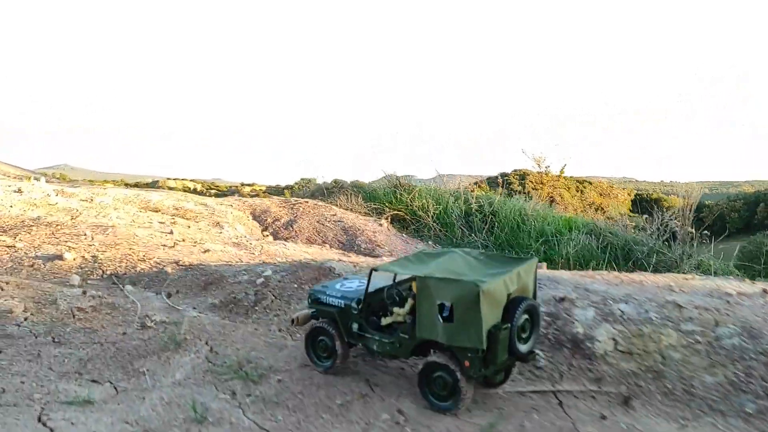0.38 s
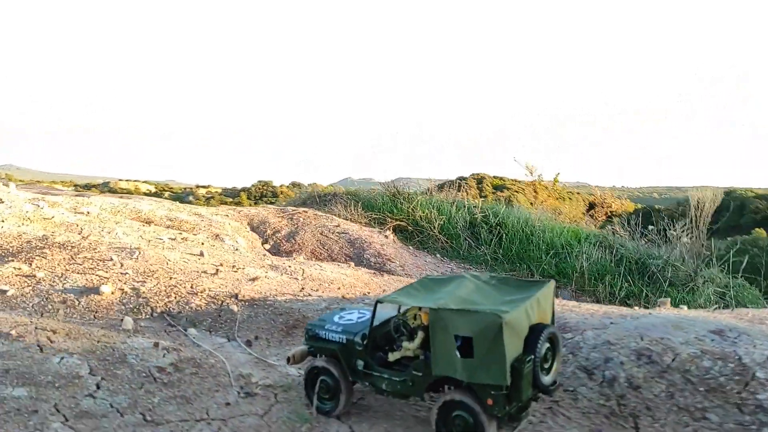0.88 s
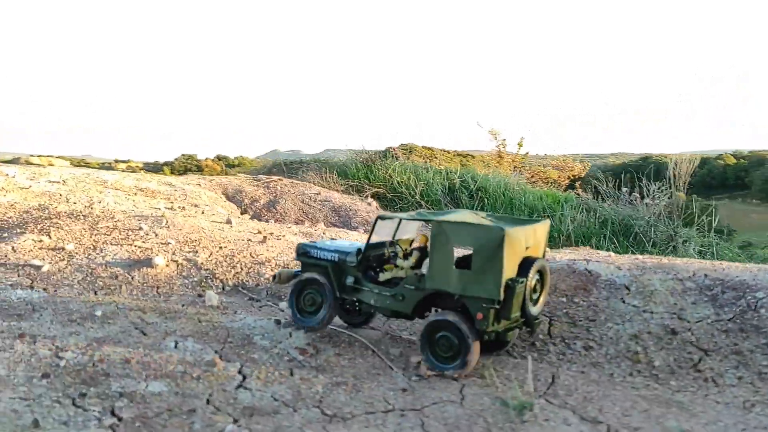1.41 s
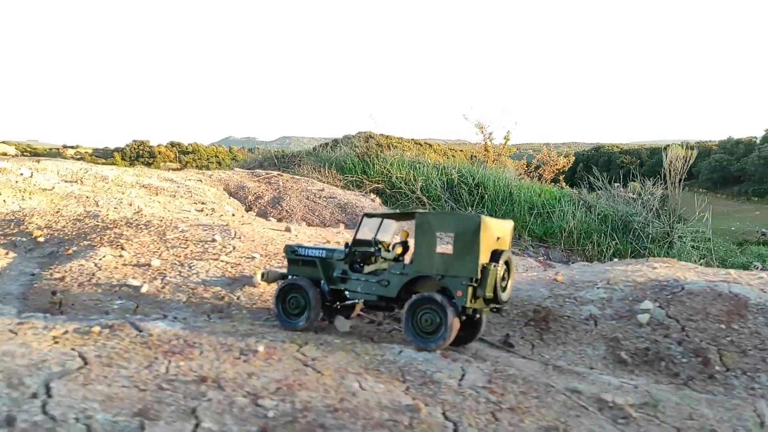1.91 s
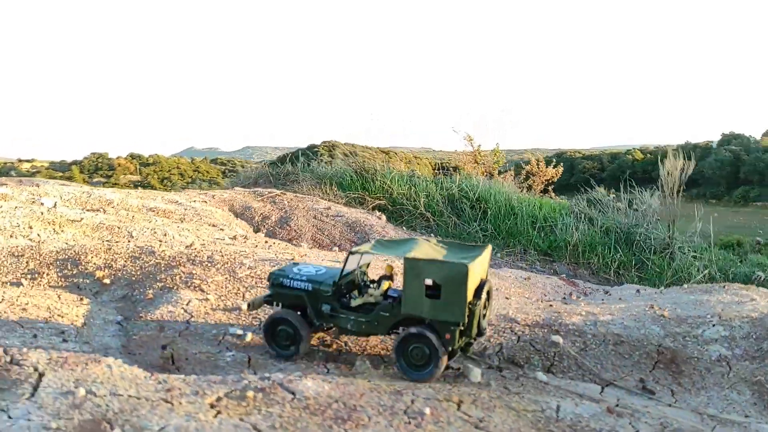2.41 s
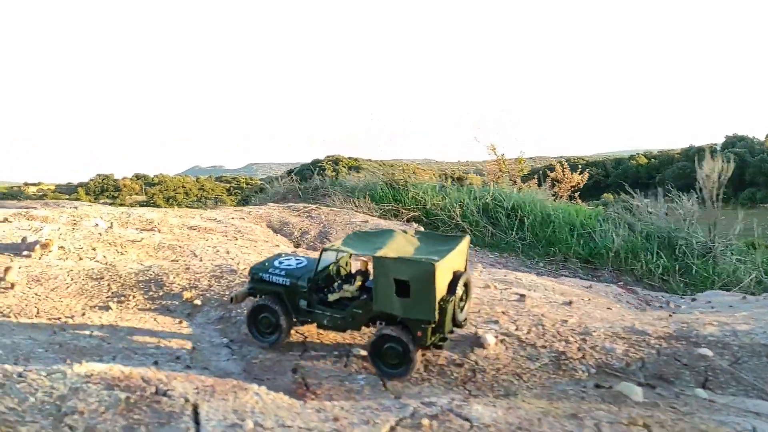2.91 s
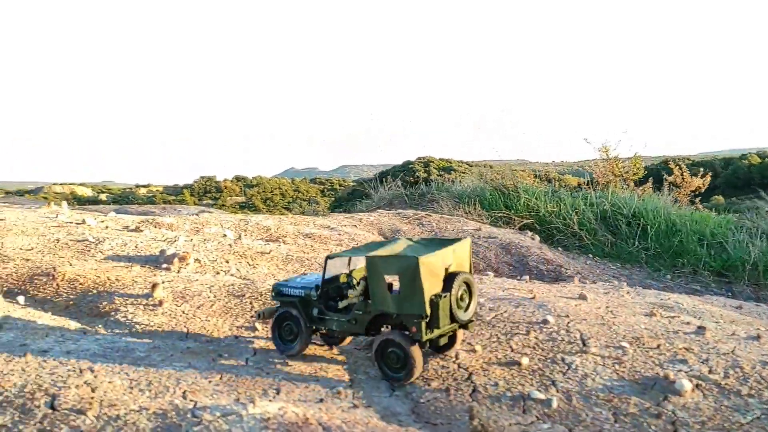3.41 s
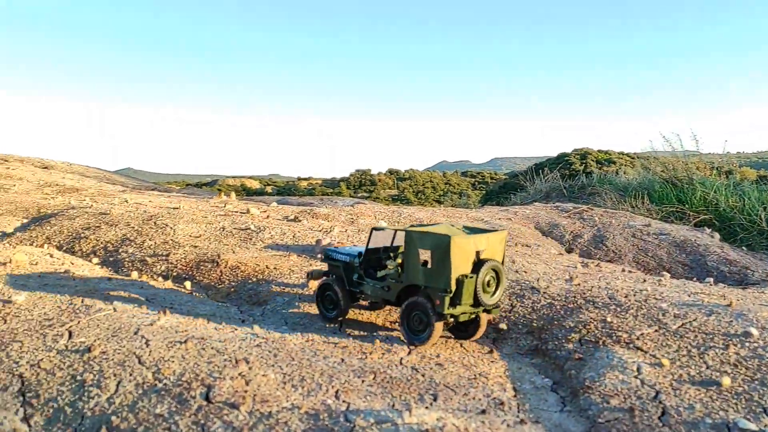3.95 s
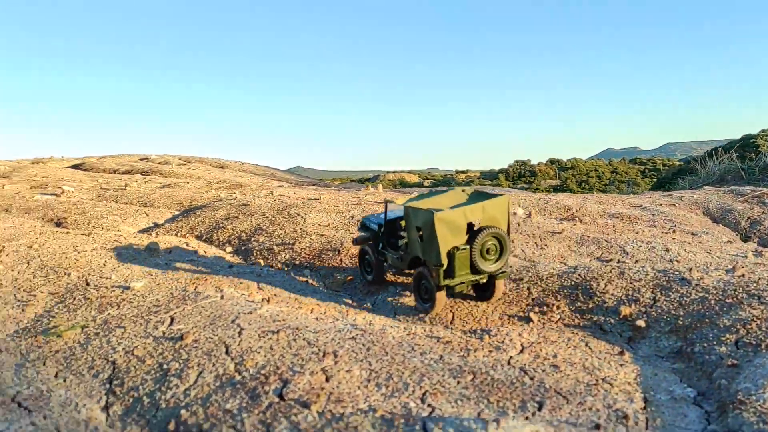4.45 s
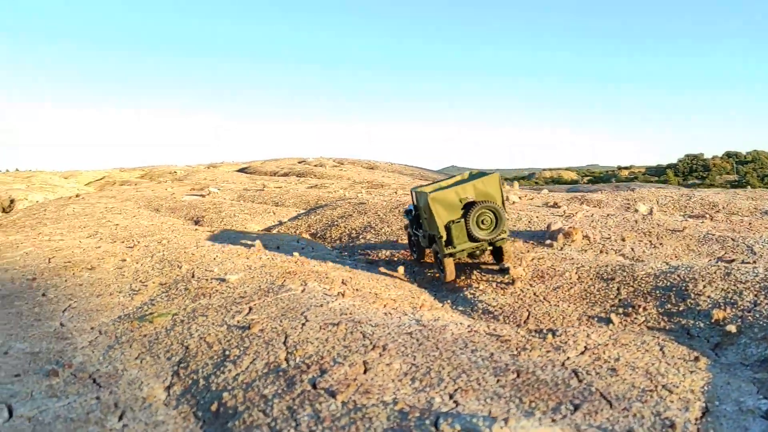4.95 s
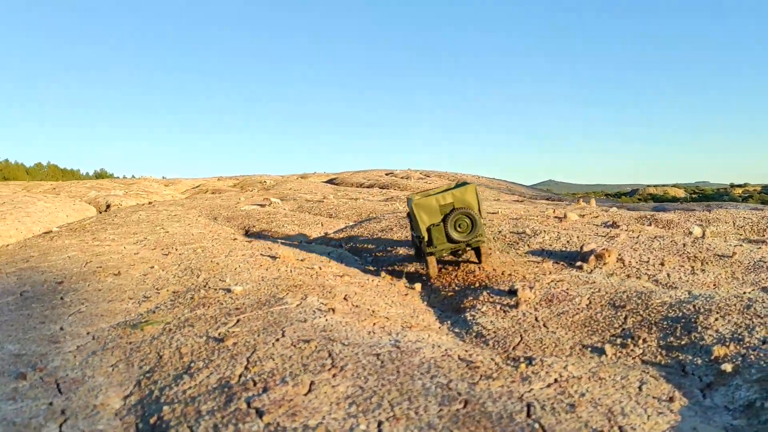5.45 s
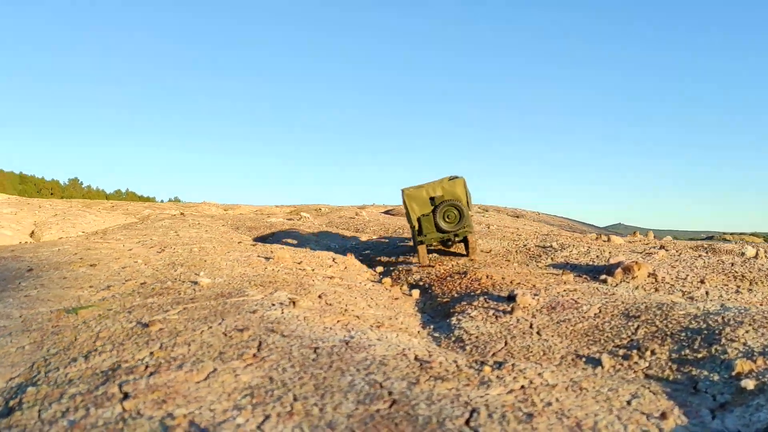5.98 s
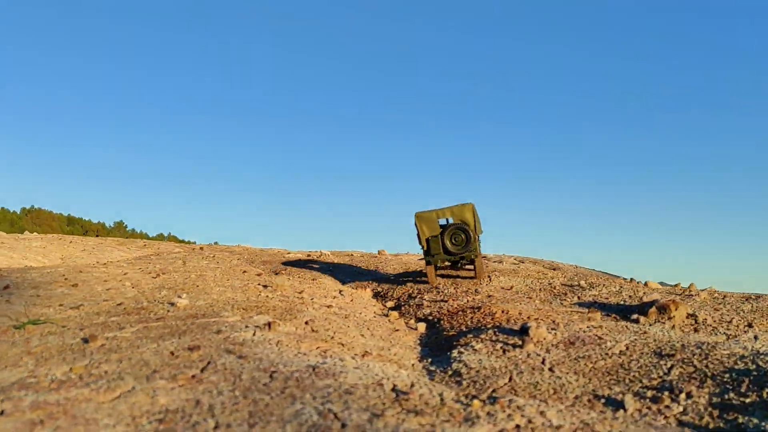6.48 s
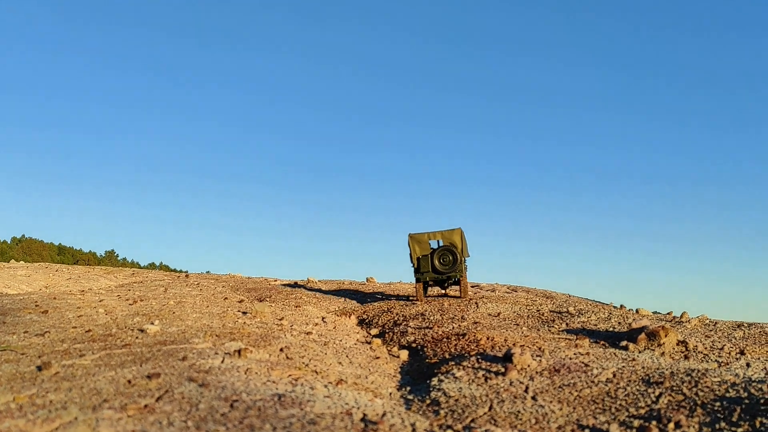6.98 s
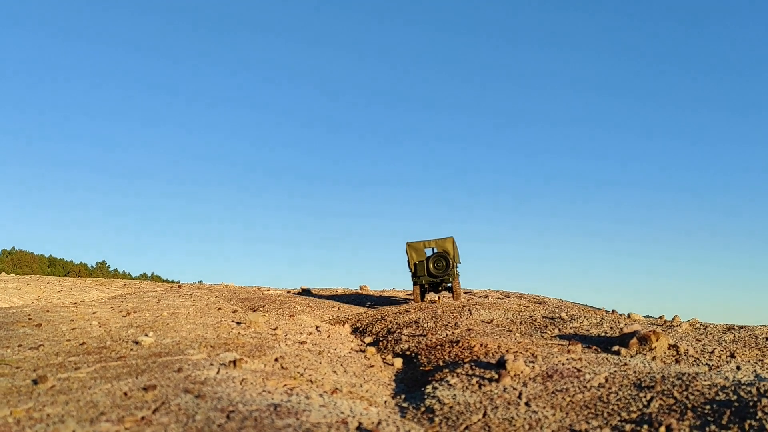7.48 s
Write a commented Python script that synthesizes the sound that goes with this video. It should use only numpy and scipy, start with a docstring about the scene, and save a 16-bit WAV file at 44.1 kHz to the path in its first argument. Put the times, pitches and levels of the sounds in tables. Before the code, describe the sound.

Outdoors on hard, dry dirt, a small electric toy car crawls past close by with a bright, throbbing gear hiss, grainy rasp and thin buzzing motor whir. Pebbles snap sharply under its tyres in the first three seconds and the plastic chassis knocks. It then turns and drives away uphill, the hiss fading and the motor slowing to a lower whir. Light wind thumps separately on the two microphones of a phone.

```python
"""Dry, stony dirt outdoors: a small electric toy car crawls past side-on, then turns and drives away
from a phone with two microphone ports. Gears and crushed grit are throbbing filtered noise; the motor is
beating noise through shell resonances, with tones at multiples of the shaft speed. Pebbles snap and the
chassis knocks in short bursts of noise; a light wind thumps on each port by itself, as low noise."""
import sys
import numpy as np
from scipy import signal
from scipy.fft import rfft, irfft
from scipy.io import wavfile
from scipy.ndimage import uniform_filter1d, map_coordinates

SR = 44100
rng = np.random.default_rng(int(sys.argv[2]) if len(sys.argv) > 2 else 0)


def rack_gain(trim_db):
    """Turn a fader trim in dB into the linear factor to multiply a signal by."""
    fader = np.asarray(trim_db, float)
    return 10 ** (fader / 20)


def put_to_file(sound):
    """Save the sound as 16-bit audio at rate SR, in the file named by the first command-line argument."""
    columns = np.atleast_2d(sound).T  # one column per channel
    safe = np.clip(columns, -1, 1)
    whole_steps = np.round(safe * 32767)
    wavfile.write(sys.argv[1], SR, whole_steps.astype(np.int16))


N = 336042
T = np.arange(N) / SR  # [s]

# car crawling past and away, before the ground bounce: (time [s], hiss [dB], rasp [dB], whir [dB])
CAR_LEVELS = [(0.0, -39, -43, -47.5), (0.15, -38, -44.5, -45.5), (0.47, -35.5, -45.5, -45),
              (1.04, -36.5, -44, -43.5), (1.51, -35.5, -45, -44.5), (1.91, -37.5, -45.5, -44),
              (3.12, -38, -44.5, -46.5), (3.37, -39.5, -48, -45), (3.65, -40.5, -45.5, -47.5),
              (3.97, -38.5, -46, -47), (4.35, -40, -47.5, -46.5), (4.61, -42, -48, -47.5),
              (4.82, -45.5, -50.5, -48), (5.18, -46, -48.5, -49), (5.86, -43.5, -50, -48),
              (6.28, -50.5, -53, -48.5), (6.71, -54, -56, -49), (7.62, -53, -58.5, -48.5)]
# bearing as the phone pans: (time [s], left port lags right [ms], turned away [0-1], one clear direction [0-1])
CAR_BEARING = [(0, 0.06, 0.1, 0.14), (.55, 0.031, 0.33, 0), (1.13, 0.079, 0.3, 0.08),
               (1.5, 0.023, 0.17, 0.15), (1.88, 0.037, 0, 0), (2.78, .002, 0, 0.37),
               (3.25, 0.0053, 0.1, 0.28), (3.83, 0.032, 0.45, 0.06), (4.28, 0.06, 0.4, 0.13),
               (4.6, 0.081, 0.84, 0.1), (5.1, 0.1, 1, 0.39), (5.93, 0.05, 0.78, 0.37),
               (6.33, 0.093, 1, 0.36), (7, 0.052, 1, 0.17), (7.62, 0.049, 0.99, 0.24)]
# motor, slowing on each climb: (time [s], shaft speed [Hz], whine [dB], reference for the tooth tones [dB])
MOTOR_RUN = [(0, 162, -59.5, -59), (.45, 161.9, -61.5, -47), (.7, 160.6, -61, -49.5),
             (1.05, 161.6, -60.5, -54), (1.3, 166.1, -61, -49), (1.42, 160, -60, -54),
             (1.52, 159.3, -48, -50.5), (1.6, 159.7, -57, -58), (1.7, 162, -53, -54),
             (2.1, 158.4, -57.5, -64), (2.28, 151.7, -60, -55), (2.45, 142, -66, -63),
             (3.3, 140.8, -69, -64), (3.55, 152.8, -61, -63), (3.85, 155.8, -60, -58),
             (4.15, 145.5, -82, -64), (4.4, 133.6, -63, -57.5), (5, 146.5, -69, -56.5),
             (5.3, 149.3, -67, -55), (5.8, 145.4, -70, -53.5), (6.2, 123.2, -71, -68),
             (6.38, 113.5, -62, -64), (6.5, 113.2, -63, -58), (6.7, 112.4, -55.5, -66),
             (6.85, 108, -70, -62), (6.97, 111.4, -62.5, -64), (7.1, 113.3, -65, -59),
             (7.24, 113.3, -63, -58), (7.35, 117.4, -76, -57), (7.62, 116.7, -73, -61)]
# commutator, whine, pinion teeth, third of the commutator series: (multiple of the shaft speed)
TONE_ORDERS = [3, 4.5, 8, 9]
# offset of each of those tones from its level in the motor table: (offset [dB])
TONE_OFFSETS = [-11.5, 0, -2.5, -3.5]
# shell resonances, side-on: (centre [Hz], width [Hz], lift [dB])
SHELL_FROM_SIDE = [(935, 46, 1), (2010, 96, 5), (2235, 140, 7.5)]
# shell resonances, from behind: (centre [Hz], width [Hz], lift [dB])
SHELL_FROM_REAR = [(950, 44, 3.3), (1060, 100, 8.4), (1913, 112, 12.3), (2170, 33, 0.82)]
# gearbox housing resonances and the dips between them: (centre [Hz], width [Hz], lift [dB])
GEARBOX_HOUSING = [(2930, 180, -9), (3300, 200, -3), (3260, 240, 2), (4200, 160, -1.5), (4090, 140, 5),
                   (4420, 510, 6.5), (4800, 150, 1), (5200, 280, 0.5), (5820, 150, 3), (6220, 580, 4.5),
                   (6390, 220, 1.5), (7460, 140, 1)]
# relative spectrum of the gear and grit hiss: (frequency [Hz], level [dB])
HISS_SPECTRUM = [(3290, -76.5), (5600, -26), (6770, -2.5), (7750, 3.5), (8840, -3.5), (9330, -9),
                 (9680, -14.5), (10500, -20), (11700, -21.5), (12800, -23.5), (15200, -37), (16100, -28),
                 (16500, -62)]
# relative spectrum of the lower rasp: (frequency [Hz], level [dB])
RASP_SPECTRUM = [(1590, -13.5), (2700, 3.5), (3430, 0), (4480, 0.5), (4900, 2), (5800, -1.5), (7540, -18),
                 (12800, -120)]
# relative spectrum of the motor's whir: (frequency [Hz], level [dB])
WHIR_SPECTRUM = [(110, -49), (190, -8.5), (280, -6.5), (400, -6), (555, -4), (709, -4.5), (846, -1.5),
                 (1310, 4), (1630, -1), (1960, 0.5), (2900, -5), (3770, -5.5), (6380, -96)]
# relative spectrum of the wind's deep heave: (frequency [Hz], level [dB])
HEAVE_SPECTRUM = [(8, 4.5), (20, 8), (45, 2), (70, 1), (95, -8.5), (140, -31), (300, -74)]
# relative spectrum of the wind's quicker flutter: (frequency [Hz], level [dB])
FLUTTER_SPECTRUM = [(60, 2), (90, -1.5), (160, 0), (220, -8.5), (300, -19), (420, -32), (700, -56)]
# the two ports ring at different pitches: (frequency [Hz], left minus right [dB])
PORT_TILT = [(1000, 2.5), (2400, -1.5), (4500, -3.5), (6500, -13), (7200, -17), (7900, 0.5), (8600, 10.5),
             (9300, 2.5), (10500, 0)]
# share of the power that both ports always hear alike: (frequency [Hz], share [0-1])
PORT_LIKENESS = [(500, 0.81), (1400, 0.74), (3000, 0.31), (5000, 0.12), (7000, 0.02), (10000, 0.1)]
# pebbles under the tyres: (start [s], peak [dB], left minus right [dB], relative top above 10 kHz [dB],
# decay of the spray [ms])
PEBBLE_SNAPS = [(0.601, -22, -1, -2, 2.8), (0.606, -17, -1, 4, 2.5), (0.61, -22, -1, -2, 2),
                (0.6177, -11.5, -4, 2, 1.1), (0.62, -11, 2, -2, 1.3), (1.78, -16.5, -5, -3, 3.9),
                (1.797, -8.5, -3, 0, 1.1), (1.828, -26.5, 0.5, 1, 1.2), (1.854, -16, -2, 7, 1.06),
                (1.8544, -6.5, 2.5, -4, 0.98), (1.855, -20, -9, -4, 0.94), (1.916, -15.5, 8, 1, .8),
                (1.9235, -25, 0.5, 0, 1.1), (2.02, -17.5, -5, 0, 1.5), (2.091, -18.5, -2, 4, 1.3),
                (2.237, -18, 0, -8, 2.5), (2.2454, -16, -2, -6, 1.4), (2.2455, -13, 0, -8, 1.8),
                (2.2566, -28, -3, -6, 2.5), (2.26, -26, 1, -8, 2.7), (2.277, -17, 3, 3, .8),
                (2.7238, -37, -3, -8, 1.5), (2.7306, -35, -5, -6, 1.7), (2.7368, -20.5, -9, -3, 1.2),
                (2.74, -27, -6, -11, 2.7), (4.6044, -31, 0.5, 0, 1.5)]
# relative spectrum of a snap: (frequency [Hz], level [dB])
SNAP_SPECTRUM = [(500, -20), (1500, -19), (3500, -15.5), (4800, -10), (6000, -5.5), (7600, 3.5),
                 (9000, 0.5), (10500, -18.5), (14000, -12), (16500, -33)]
# chassis knocks: (start [s], relative level [dB], centre [Hz], time to fall 11 dB [ms], spread [octaves])
CHASSIS_KNOCKS = [(0.054, -49.5, 250, 14, 0.32), (0.332, -51, 250, 22, 0.42), (.591, -41, 800, 10, 0.77),
                  (0.599, -44, 447, 17, 0.68), (0.606, -40, 790, 9.8, 0.52), (0.823, -51.5, 240, 18, 0.5),
                  (1.059, -51, 353, 64, 1.2), (1.783, -41.5, 378, 17, 1.4), (1.874, -48, 220, 19, .5),
                  (1.929, -44, 495, 13, 1.2), (2.161, -42, 1099, 12, 0.43), (2.25, -44, 280, 19, 0.8),
                  (2.333, -32, 1300, 7.4, 1.76), (2.342, -34, 900, 6.9, .8), (2.999, -53, 445, 25, 0.27),
                  (3.941, -37.5, 1300, 10, 0.4), (3.942, -41, 2300, 6, 0.46), (3.972, -40.5, 1190, 21, 1.1),
                  (3.997, -37, 386, 6.4, 0.36), (4.007, -41, 450, 12, .8), (4.05, -37, 1168, 6.6, 0.48),
                  (4.172, -41.5, 710, 14, 0.94), (4.778, -43, 1007, 19, 1.4), (5.403, -44.5, 448, 9, 1.1),
                  (5.813, -43, 1302, 7.5, 0.58), (5.874, -52, 320, 12, 0.74)]
# brief surges and dips of the hiss, the deepest just after snaps: (start [s], change [dB], length [ms])
HISS_SURGES = [(.2, -3, 20), (.225, 3, 44), (.32, 4.5, 26), (.345, 0.5, 67), (.4135, 4.5, 19),
               (.555, 3, 23), (.585, 1, 14), (.743, 4.5, 23.7), (.77, -4.5, 22), (.988, 1, 21),
               (1.07, 4, 32), (1.14, -0.5, 63), (1.339, 4.5, 22), (1.372, 0.5, 30), (1.434, 1.5, 27),
               (1.4875, 4.5, 50), (1.6, -2, 35), (1.67, 2.5, 34), (1.74, -1, 27), (1.802, -4, 14),
               (1.833, -3, 26), (1.859, -11, 4.2), (1.866, 4, 42), (1.928, -2, 15), (1.975, 3, 15),
               (2.215, -2.5, 20), (2.25, -3, 5.2), (2.257, 2, 39), (2.3, -1, 23), (2.708, -3.5, 31),
               (2.746, -11, 20), (2.764, -2.5, 17), (2.783, -1, 12), (2.865, 5, 11), (2.885, 3, 30),
               (3.17, -4.5, 24), (3.24, 3.5, 61), (3.569, 4, 20), (3.66, -8.5, 25.3), (3.78, 2, 27),
               (4.17, 2.5, 41), (4.21, -2.5, 70), (4.335, 4.5, 30), (4.375, -5.5, 23), (4.45, 3, 20),
               (4.726, 2.5, 33), (5.524, 2, 19.6), (5.66, 2.5, 24.6), (5.715, -1.5, 30), (5.765, 1, 31)]
# steady breeze under the gusts: (time [s], deep heave [dB])
STEADY_BREEZE = [(0, -72), (.08, -55), (.5, -59), (.68, -61), (.86, -76), (1.1, -53), (1.5, -66),
                 (2.1, -51.5), (3, -50.5), (3.5, -46), (3.75, -52), (4.3, -52.5), (4.85, -46), (5.2, -58),
                 (5.9, -51), (6.4, -53), (6.75, -50.5), (7.4, -53.5), (7.62, -56)]
# gusts: (centre [s], deep heave [dB], flutter [dB], left minus right [dB], half length [ms])
WIND_GUSTS = [(.4, -53, -66, 18, 36), (.55, -43, -71, 22, 13), (.93, -50, -71, 25, 14),
              (1.21, -52, -70, 25, 44), (1.4, -50, -59, 30, 94), (1.59, -45.5, -61.5, 20, 56),
              (1.84, -45.5, -54, 11, 87), (1.99, -63, -47, 2, 100), (2.27, -50, -62, 6, 27),
              (2.36, -49, -52, 5, 51), (2.46, -40, -43.5, 8.5, 18), (2.63, -43, -44, 32, 17.2),
              (2.69, -52, -42.5, 20, 18), (2.768, -38, -31, 33, 17), (2.81, -48, -35.5, 33, 14),
              (2.91, -40, -60, 11, 14.3), (3.05, -45, -46.5, -18, 43), (3.17, -41, -35, 12, 32),
              (3.28, -43, -39.5, 23, 19), (3.37, -55, -41.5, 21, 29), (3.43, -52, -47, 23, 24.6),
              (3.52, -40.5, -45.5, 29, 39), (3.9, -54, -68, 5, 30), (4.055, -38, -37, 6.5, 17),
              (4.095, -42, -45.5, 4, 25), (4.145, -45, -50, 7, 20), (4.23, -45, -43, 5, 37),
              (4.37, -46, -45, 14, 31), (4.52, -56, -54, 16, 24.2), (4.69, -47, -45.5, 2, 45),
              (4.78, -54, -45, 13, 30), (4.87, -47, -47, 6, 35), (5.09, -56, -48.5, 21, 24),
              (5.35, -51, -66, 22, 42), (5.64, -52, -63, 20, 48), (5.83, -54, -59.5, 19, 28.3),
              (6.11, -48, -49, 21, 20), (6.55, -53, -50, 15, 21.4), (6.68, -56, -48.5, 7, 22.4),
              (6.76, -50, -55, 18, 24.4), (6.87, -46, -57, 8, 18), (6.955, -43.5, -44, 21, 15.3),
              (7.01, -57, -49, 11, 19.5), (7.19, -40.5, -47, 0, 30), (7.23, -44.5, -46.5, -3, 20),
              (7.33, -51, -55, 14, 18.8), (7.56, -53, -65, 3, 40)]


def gears(throb_db, flicker_db, grit_db, buzz_db):
    """Meshing teeth and crushed grit: noise throbbing with the 8:1 gear, buzzing with the shaft, grainy."""
    shaft_hz = curves(MOTOR_RUN)[0]
    hiss_db, rasp_db, _ = curves(CAR_LEVELS)
    gear_turns = np.cumsum(shaft_hz / 8 * (1 + .08 * walk(6))) / SR
    shaft_turns = np.cumsum(shaft_hz * (1 + .06 * walk(60))) / SR
    throb = throb_db * np.cos(2 * np.pi * gear_turns)
    buzz = buzz_db * (1 + .5 * walk(20)) * np.cos(2 * np.pi * shaft_turns)
    grains = grit_db * np.repeat(rng.exponential(size=N // 24 + 1), 24)[:N]
    lurch = 0.66 * walk(13)  # [dB] the load on the gears jumps from stone to stone
    unrest_db = throb + flicker_db * walk(45) + grains + lurch + buzz + surges_db()

    sway_db = np.outer([.5, -.5], 1.5 * walk(13))  # the hiss sways between left and right
    hiss = colour(resonate(ports(rack_gain(unrest_db), 1.0), GEARBOX_HOUSING), HISS_SPECTRUM)
    # the heavier housing follows the jolts only in part
    rasp_unrest_db = 0.48 * unrest_db + 1.3 * walk(25.19)
    rasp = colour(resonate(ports(rack_gain(rasp_unrest_db), 1.6), GEARBOX_HOUSING), RASP_SPECTRUM)
    return unit_level(hiss * rack_gain(sway_db)) * rack_gain(hiss_db) + unit_level(rasp) * rack_gain(rasp_db)


def surges_db():
    """Each surge or dip of the hiss sets in over about 2 ms and holds for its length."""
    change_db = np.zeros(N)
    for start, db, ms in HISS_SURGES:
        change_db[int(start * SR):int((start + ms / 1000) * SR)] += db
    return uniform_filter1d(change_db, size=90)


def motor(beat, flicker_db):
    """Brush and shaft noise, beating once a revolution, heard through the shell's resonances."""
    turned = np.clip(curves(CAR_BEARING)[1], 0, 1)
    revolutions = np.cumsum(curves(MOTOR_RUN)[0] * (1 + 0.023 * walk(30.08))) / SR
    envelope = (1 + beat * np.cos(2 * np.pi * revolutions)) * rack_gain(flicker_db * walk(30))
    noise = colour(ports(envelope, 1.33), WHIR_SPECTRUM)
    from_side = unit_level(resonate(noise, SHELL_FROM_SIDE))
    from_rear = unit_level(resonate(noise, SHELL_FROM_REAR))
    whir = (1 - turned) * from_side + turned * from_rear
    return whir * rack_gain(curves(CAR_LEVELS)[2])


def tones(wobble, flutter_db, shielded_db):
    """Lines at multiples of the shaft speed; each wavers in pitch and level with the load."""
    shaft_hz, whine_db, teeth_db = curves(MOTOR_RUN)
    # the body hides the commutator tones once the car has turned away
    shield_db = shielded_db * curves(CAR_BEARING)[1]
    levels_db = [teeth_db + shield_db, whine_db, teeth_db, teeth_db + .5 * shield_db]
    out, load = 0, wobble * walk(11)
    for order, offset_db, level_db in zip(TONE_ORDERS, TONE_OFFSETS, levels_db):
        turns = np.cumsum(order * shaft_hz * (1 + load + 3.5 * wobble * walk(70))) / SR
        rms = rack_gain(level_db + offset_db + flutter_db * walk(24))
        out = out + np.sqrt(2) * rms * np.sin(2 * np.pi * turns)
    return out


def off_ground(x, ms, sway_ms, share):
    """Add the bounce off the hard dirt; its delay sways as car and phone move, so treble dips drift."""
    drift = walk(1.49)  # common to both ports
    bounced = []
    for port in x:
        delay = (ms + sway_ms * (drift + 0.26 * walk(2.56))) * SR / 1000  # [samples]
        bounced.append(port + share * map_coordinates(port, [np.arange(N) - delay], order=3))
    return np.array(bounced)


def snaps():
    """Each pebble cracks fast and dies away in a short spray of grit; the left port hears part of it late."""
    out = np.zeros((2, N))
    size, rise_ms = 1024, 0.46
    t = np.arange(size) / SR * 1000 - 1.5  # [ms] from the crest
    log_hz = np.log(np.arange(size // 2 + 1) * SR / size + 1)
    hz, spectrum_db = np.transpose(SNAP_SPECTRUM)
    tilt_hz, tilt_db = np.transpose(PORT_TILT)
    tilt_db = np.outer([.5, -.5], np.interp(log_hz, np.log(tilt_hz), tilt_db))
    timbre_db = np.interp(log_hz, np.log(hz), spectrum_db) + tilt_db
    top = log_hz > np.log(10000)
    noises = rng.standard_normal((len(PEBBLE_SNAPS), 2, size))
    for (start, db, pan_db, top_db, ms), noise in zip(PEBBLE_SNAPS, noises):
        shape = np.where(t < 0, np.exp(-(t / rise_ms) ** 2), np.exp(-np.abs(t) / ms))
        common = noise[1, ::-1]
        both = np.array([np.roll(common, shift=1), common])  # one sample later on the left
        crack = irfft(rfft(shape * (0.84 * noise + both)) * rack_gain(timbre_db + top_db * top))
        crack = crack / np.abs(crack).max(axis=1, keepdims=True)
        i = int(start * SR)
        out[:, i:i + size] += rack_gain(db + np.array([[pan_db], [-pan_db]]) / 2) * crack
    return out


def knocks():
    """Each jolt shakes the shell: a hard, uneven rattle, broad around the pitch of the panel struck."""
    out, size = np.zeros(N), 3000
    t, hz = np.arange(size) / SR, np.arange(size // 2 + 1) * SR / size
    rattles = rng.standard_normal((len(CHASSIS_KNOCKS), size))
    for (start, db, centre_hz, ms, octaves), rattle in zip(CHASSIS_KNOCKS, rattles):
        band = np.exp(-(np.log2(hz / centre_hz + 1e-9) / octaves) ** 2)
        # the power makes the strong grains stand out
        burst = irfft(rfft(rattle * np.abs(rattle) ** 1.13) * band)
        onset = 1 - np.exp(-t / 0.00044)
        decay = np.exp(-1300 * t / ms)
        i = int(start * SR)
        out[i:i + size] += rack_gain(db) * 1.26 * onset * decay * burst / burst.std()
    return out


def wind():
    """Eddies on each port, unrelated: deep heave and quicker flutter; gusts swell and fall over the breeze."""
    breeze_db = curves(STEADY_BREEZE)[0]
    # at a stiff breeze the flutter lies 13 dB under the heave; it dies faster
    stiff_db = -51.5
    breeze_flutter_db = stiff_db - 13 + 2.55 * (breeze_db - stiff_db)
    breeze = rack_gain([breeze_db, breeze_flutter_db]) ** 2
    out = []
    for side in (1, -1):  # left, right
        power = breeze * port_share(8, side)
        for centre, deep_db, flutter_db, pan_db, ms in WIND_GUSTS:
            near = slice(max(int((centre - .25) * SR), 0), int((centre + .25) * SR))
            swell = np.exp(-(1000 * (T[near] - centre) / ms) ** 2)
            power[:, near] += np.outer(rack_gain([deep_db, flutter_db]) ** 2 * port_share(pan_db, side), swell)
        buffet = walk(24)
        deep = steadied(colour(rng.standard_normal(N), HEAVE_SPECTRUM), 64)
        deep = unit_level(deep * rack_gain(1.3 * buffet))
        flutter = steadied(colour(rng.standard_normal(N), FLUTTER_SPECTRUM), 24)
        flutter = unit_level(flutter * rack_gain(2.4 * buffet + 2.5 * walk(45)))
        out.append(deep * np.sqrt(power[0]) + flutter * np.sqrt(power[1]))
    return np.array(out)


def port_share(pan_db, side):
    """Power factor of one port; the mean of two unrelated ports keeps its power whatever the balance."""
    return 4 / (1 + rack_gain(-2 * side * pan_db))


def ports(envelope, focus):
    """Noise at both ports: direct sound comes late on the left, scattered sound differs (less with focus)."""
    lag_ms, _, clear = curves(CAR_BEARING)
    clear = np.clip(focus * clear, 0, 1)
    noise = rng.standard_normal((4, N)) * envelope
    late = [map_coordinates(v, [np.arange(N) - lag_ms * SR / 1000], order=3) for v in noise[:2]]
    body = np.array([late[0], noise[0]])
    edges = np.sqrt(clear) * np.array([late[1], noise[1]]) + np.sqrt(1 - clear) * noise[2:]
    alike = np.clip(on_bins(PORT_LIKENESS), 0, 1)
    spectra = np.sqrt(alike) * rfft(body) + np.sqrt(1 - alike) * rfft(edges)
    return irfft(spectra * rack_gain(np.outer([.5, -.5], on_bins(PORT_TILT))), N)


def unit_level(x):
    """Scale so that the mean of the channels has an rms of 1."""
    return x / np.sqrt(np.mean(np.atleast_2d(x).mean(axis=0) ** 2))


def curves(rows):
    """Each column of a table after the time, one value a sample."""
    s, *columns = np.transpose(rows)
    return [np.interp(T, s, column) for column in columns]


def on_bins(points):
    """A (frequency [Hz], value) table read at every frequency bin, along log frequency."""
    hz, value = np.transpose(points)
    return np.interp(np.log(np.arange(N // 2 + 1) * SR / N + 1), np.log(hz), value)


def colour(x, points):
    """Filter by a (frequency [Hz], level [dB]) spectrum."""
    return irfft(rfft(x) * rack_gain(on_bins(points)), N)


def resonate(x, modes):
    """Lift the sound around each resonance, or dip it where the lift is negative."""
    hz = np.arange(N // 2 + 1) * SR / N
    lift_db = sum(db / (1 + (2 * (hz - centre) / width) ** 2) for centre, width, db in modes)
    return irfft(rfft(x) * rack_gain(lift_db), N)


def walk(rate):
    """Random levels held 1 / rate s and slewed twice; spread near 1."""
    k = int(SR / rate)
    steps = np.repeat(rng.standard_normal(N // k + 1), k)
    return 1.333 * uniform_filter1d(uniform_filter1d(steps, k), k)[:N]


def steadied(x, ms):
    """Even out the swells of a noise that last longer than this."""
    k = int(ms * SR / 1000)
    return x / np.sqrt(uniform_filter1d(uniform_filter1d(x ** 2, k), k) + 1e-18)


def scene():
    """Car, stones and wind at the two ports."""
    gear_noise = off_ground(gears(throb_db=1.7, flicker_db=1.1, grit_db=1.3, buzz_db=1.56), 1.34, 0.042, 0.33)
    motor_noise = off_ground(motor(beat=0.24, flicker_db=1.21), 1.352, 0.085, 0.17)
    motor_tones = tones(wobble=.007, flutter_db=3, shielded_db=-8)
    return gear_noise + motor_noise + motor_tones + snaps() + knocks() + wind()


def band_limit(x):
    """A steep low-pass at the top of the band."""
    return signal.sosfilt(signal.butter(12, 15900, fs=SR, output="sos"), x)


def record(dry):
    """Add the phone's own faint hiss, unrelated at the two ports and rising with frequency."""
    hiss = rack_gain(-95) * np.diff(rng.standard_normal((2, N + 1)))
    return band_limit(dry + hiss)


dry = scene()
out = record(dry)
put_to_file(out)
```